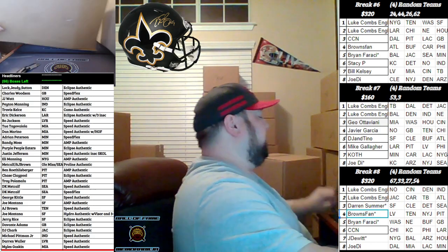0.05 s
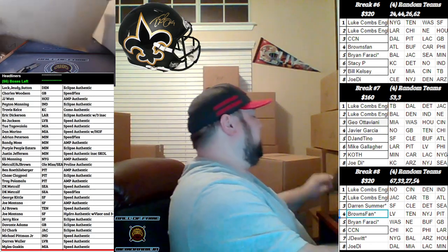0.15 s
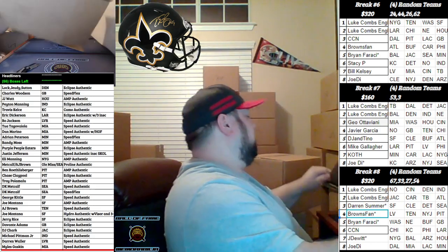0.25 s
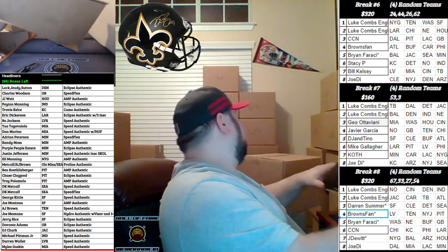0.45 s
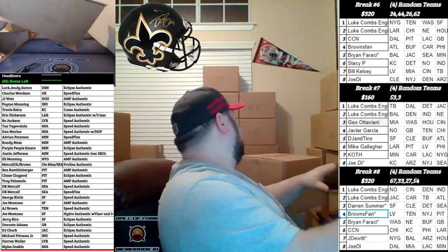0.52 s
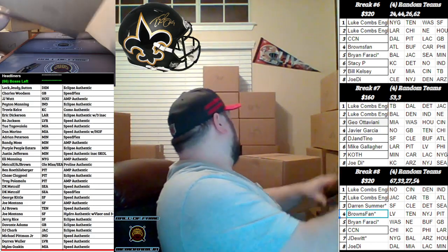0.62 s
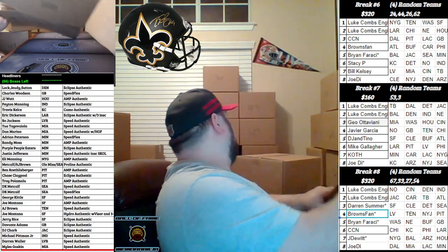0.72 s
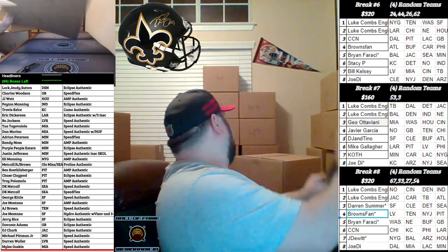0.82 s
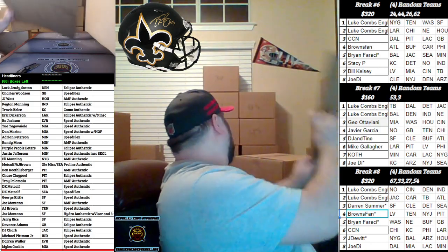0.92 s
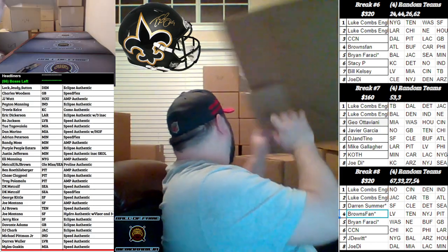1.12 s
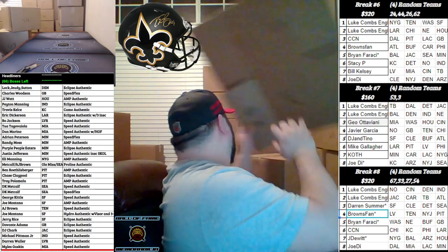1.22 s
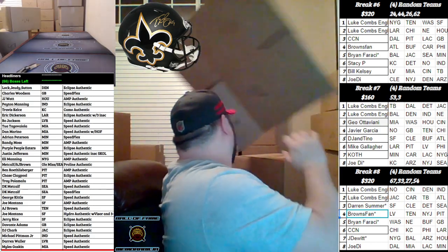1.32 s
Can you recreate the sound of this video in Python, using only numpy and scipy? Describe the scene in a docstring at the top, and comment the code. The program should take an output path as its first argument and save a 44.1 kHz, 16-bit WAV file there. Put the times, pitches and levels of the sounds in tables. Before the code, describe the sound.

A cardboard box handled close to the microphone: a soft low bump, a short squawking scrape, then a loud hollow double knock with papery sliding, fading into light ticks and rustles in a lively small room.

```python
"""In a small live room, a cardboard box is worked out of a stack and lifted.
It bumps hollowly (decaying box modes, slap, thud) and judders in two short squawks (slips ring a panel).
It slides with a papery hiss (coloured clicks); edges tick (noise bursts) and flaps knock (roughened notes).
One microphone takes the box direct, with no distance loss, then the room's reverberation and its quiet air."""
import sys
import numpy as np
from scipy import signal
from scipy.fft import rfft, irfft
from scipy.io import wavfile
from scipy.ndimage import uniform_filter1d

SR = 44100
rng = np.random.default_rng(int(sys.argv[2]) if len(sys.argv) > 2 else 0)


def to_wav(s):
    """Save 16-bit WAV."""
    ch = np.atleast_2d(s).T  # columns
    pcm = np.round(np.clip(ch, -1, 1) * 32767)  # PCM
    wavfile.write(sys.argv[1], SR, pcm.astype(np.int16))


N = 59535  # samples, 1.35 s


def undb(db):
    """Decibels to gain."""
    return 10 ** (np.asarray(db) / 20)


def unit(x):
    """Scale to rms 1."""
    return x / np.sqrt(np.mean(x ** 2) + 1e-20)


def since(start):
    """Seconds since a start time, zero before it."""
    return np.maximum(np.arange(N) / SR - start, 0)


def fade(t, t60):
    """Exponential decay, 60 dB down at t60."""
    return np.exp(-np.log(1000) * t / max(t60, 1e-3))


def swell(start, attack, hold, release):
    """Linear attack, hold and exponential release (a t60) of one stroke."""
    rise = np.minimum(since(start) / max(attack, 1e-4), 1)
    return rise * fade(since(start + attack + hold), release)


def spectrum_gain(points, tilt_db):
    """Gain per FFT bin through (f/Hz, level/dB) points, straight in octaves, plus a tilt per octave."""
    octave = np.log2(np.maximum(np.fft.rfftfreq(N, 1 / SR), 10))
    hz, db = np.array(points).T
    return undb(np.interp(octave, np.log2(hz), db) + tilt_db * octave)


def colour(x, points, tilt_db=0):
    """Give a steady signal a spectrum; rms 1."""
    return unit(irfft(rfft(x) * spectrum_gain(points, tilt_db), N))


def convolve(x, response):
    """Pass a sound through a response."""
    return signal.fftconvolve(x, response)[:N]


def strike(points, start, t60, tilt_db=0):
    """A dying burst of noise through a causal filter with the given spectrum; starts at rms 1."""
    # folding the cepstrum onto positive times makes the filter minimum phase
    cepstrum = irfft(np.log(spectrum_gain(points, tilt_db)), N)
    response = irfft(np.exp(rfft(2 * cepstrum[:N // 2], N)), N)[:N // 10]
    t = since(start)
    burst = rng.choice([-1, 1], N) * (t > 0) * fade(t, t60)
    return convolve(burst, response / np.linalg.norm(response))


# bumps of the box: t/s, level/dB, contact/ms, pitch factor of the spot that is hit,
# slap of the face level/dB, deep thud level/dB
BUMP_BLOWS = [(.002, -28.5, 3, 0.88, -50, -55), (0.049, -18.5, 6.9, 0.95, -63, -41),
              (.303, -28, 0.52, 1.02, -31.5, -50), (.320, -27, 2.2, 1.02, -31, -45),
              (.4585, -9.5, 0.45, 1, -22, -44), (0.475, -13, 1.3, 1, -27, -45.5),
              (0.5278, -22, 1.0, 1, -31, -41.5), (0.584, -53, 3.8, 1, -48, -44.5),
              (0.677, -43, 1.1, 1, -45, -44), (.694, -49, 1.5, 0.78, -43, -44),
              (.777, -40, 1.2, 1.02, -48, -74), (.924, -37.5, 2.3, 1.02, -41.5, -53),
              (0.94, -43, 2.4, 1.06, -49, -54.5)]
# hollow ring of the box: f/Hz, level/dB, t60/s
BOX_MODES = [(181, -28.5, 0.43), (234.3, -1, 0.16), (298.3, -1.5, 0.21), (380.3, -15, 0.41),
             (412.6, -8, 0.18), (482, -10.5, 0.23), (642, -19.5, 0.35), (942, -11, 0.11), (1033, -13, 0.16),
             (1083, -19, 0.19), (1150, -22.5, 0.38), (1297, -23, .2)]
# spectrum of the slap: f/Hz, level/dB
SLAP_SPECTRUM = [(40, -37), (140, -27), (240, -1.5), (420, 0.5), (700, -6), (1050, -1.5), (1600, -3),
                 (2100, -20.5), (6000, -24.5), (16000, -40)]
# spectrum of the thud: f/Hz, level/dB
THUD_SPECTRUM = [(20, -23), (65, -6), (130, -0.5), (200, -6), (400, -3.5), (2000, -57)]
SLAP_T60_S, THUD_T60_S = 0.11, 0.17
BOX_BUILD_S = 0.0048  # the ring spreads over the walls


def bumps():
    """Each blow rings the box, duller when the contact is soft, with a slap and a thud."""
    out = np.zeros(N)
    for start, db, contact_ms, pitch, slap_db, thud_db in BUMP_BLOWS:
        t = since(start)
        build = 1 - np.exp(-t / BOX_BUILD_S)
        for hz, mode_db, t60 in BOX_MODES:
            softness = 1 / (1 + (hz * contact_ms / 1000) ** 2)  # long contact weakens high modes
            ring = np.sin(2 * np.pi * hz * pitch * t) * fade(t, t60)
            out += undb(db + mode_db) * softness * build * ring
        out += undb(slap_db) * strike(SLAP_SPECTRUM, start, SLAP_T60_S)
        out += undb(thud_db) * strike(THUD_SPECTRUM, start, THUD_T60_S)
    return out


GRAINS_PER_S, GRAIN_SPREAD_DB = 9000, 2
CATCHES_PER_S, CATCH_DB = 160, 1.5  # rate and depth of the clumping


def grit():
    """Paper fibres catching: dense tiny clicks that come in clumps."""
    hits = (rng.random(N) < GRAINS_PER_S / SR) * rng.choice([-1, 1], N)
    clicks = hits * undb(GRAIN_SPREAD_DB * np.minimum(rng.exponential(size=N), 5))
    clumps = np.interp(since(0) * CATCHES_PER_S, np.arange(N), rng.standard_normal(N))
    return clicks * undb(CATCH_DB * clumps)


# stick-slip squawks: t/s, attack/s, hold/s, release t60/s, level/dB, slip rate f/Hz
SQUAWK_STROKES = [(0.198, 0.015, 0.017, 0.17, -21.5, 279), (0.297, .012, 0.0044, 0.13, -33.5, 270)]
# panel resonances that the slips ring: f/Hz, width/Hz, level/dB
PANEL_MODES = [(276, 20, -10), (567.3, 34, 4), (829, 36, 1.5), (1320, 49, 1), (1531, 42, 10.5),
               (1580, 41, 5), (1930, 23, -0.5), (2023, 19, 9.5), (2470, 19, -5), (2700, 26, -11),
               (2998, 33, -2.5)]
# spectrum of the rasp of fibres: f/Hz, level/dB
RASP_SPECTRUM = [(30, -45), (150, -33), (400, 0.5), (1000, 13), (1600, 4), (2400, 7.5), (3100, -2),
                 (3700, -24), (16000, -42)]
SLIP_JITTER, SLIP_SCATTER_DB = 0.016, 3.5  # jitter is a share of the slip period
SLIP_NOISE, RASP_DB = 0.055, -5  # noise amplitude beside slips near 1; rasp beside the squawk
PANEL_LOW_HZ = 130  # the panel radiates little below this


def panel_response():
    """Impulse response of the panel: damped resonances, high-passed."""
    t = since(0)
    ring = sum(undb(db) * width * np.exp(-np.pi * width * t) * np.cos(2 * np.pi * hz * t)
               for hz, width, db in PANEL_MODES)
    return signal.sosfilt(signal.butter(2, PANEL_LOW_HZ, "high", fs=SR, output="sos"), ring)


def squawks():
    """Card sticks and slips in an uneven pulse train that rings the panel, over a rasp of fibres."""
    out = np.zeros(N)
    panel = panel_response()
    for start, attack, hold, release, db, slip_hz in SQUAWK_STROKES:
        timing, strength = rng.standard_normal((N // 100, 2)).T
        slip_s = start + np.cumsum(1 + SLIP_JITTER * timing) / slip_hz - 1 / slip_hz
        at = np.maximum((slip_s * SR).astype(int), 0)
        slips = np.bincount(at, undb(SLIP_SCATTER_DB * strength), N)[:N]
        slips = slips + SLIP_NOISE * rng.standard_normal(N)
        push = undb(db) * swell(start, attack, hold, release)
        # the unpushed train sets the reference level
        out += convolve(slips * push, panel) / np.std(convolve(slips, panel))
        out += undb(RASP_DB) * push * colour(grit(), RASP_SPECTRUM)
    return out


# slides of card on card: t/s, attack/s, hold/s, release t60/s, hiss level/dB,
# rub of the panel level/dB, hiss tilt/dB per octave
SLIDE_STROKES = [(0, 0.001, 0.017, 0.46, -44, -39, 5.5), (0.156, 0.013, 0.02, 0.23, -52, -48.5, 6),
                 (0.198, 0.0091, 0.034, 0.41, -33.5, -30, 6),
                 (0.374, 0.015, 0.0095, 0.41, -48.5, -41.5, -3), (0.47, 0.017, 0.037, .3, -26.5, -27, -2),
                 (0.552, 0.013, 0.014, 0.19, -36, -47, 1.5), (0.633, 0.017, 0.16, 0.4, -56, -46.5, 8.5),
                 (0.772, 0.016, 0.0044, 0.29, -41, -43, 3), (0.832, .015, 0.067, 0.18, -53.5, -52.5, 1),
                 (0.914, 0.0042, 0.024, 0.12, -45.5, -41.5, -1.5),
                 (1.09, 0.0078, 0.019, .2, -51.5, -64, -3)]
# spectrum of the hiss: f/Hz, level/dB
HISS_SPECTRUM = [(200, -25), (1000, -14), (2300, 1.5), (3300, -1.5), (5200, 1.5), (7500, 1), (10000, -5),
                 (13000, -9.5), (16000, -23)]
# spectrum of the rub: f/Hz, level/dB
RUB_SPECTRUM = [(50, -22), (150, -4.5), (390, 7), (700, -1.5), (1280, 2), (1800, -2), (2800, -8.5),
                (6000, -29), (16000, -50)]


def slides():
    """Sliding faces hiss, and the panel under them gives a lower rub."""
    out = np.zeros(N)
    for start, attack, hold, release, hiss_db, rub_db, tilt_db in SLIDE_STROKES:
        hiss = undb(hiss_db) * colour(grit(), HISS_SPECTRUM, tilt_db)
        rub = undb(rub_db) * colour(grit(), RUB_SPECTRUM)
        out += swell(start, attack, hold, release) * (hiss + rub)
    return out


# ticks of edges and flaps: t/s, level/dB, tilt/dB per octave
TICK_EVENTS = [(.0095, -30.5, 5.5), (.036, -46, 12), (0.05, -45, 1), (.196, -31, -2.5), (0.214, -23, -6.5),
               (.308, -23, -4), (0.313, -25.5, -1.5), (0.3142, -33, -4.5), (.386, -39, 6),
               (0.394, -35.5, 6.5), (.402, -48, 2), (0.4586, -27.5, -2), (.4747, -22.5, -0.5),
               (0.515, -46, 0), (0.677, -59, 15.5), (.7745, -34.5, 12), (.784, -28, -1.5),
               (.789, -29, -1.5), (0.862, -32, 2), (0.867, -39, 2), (0.94, -39.5, 5), (1.070, -53, 4),
               (1.087, -37, -1), (1.0931, -36, 0)]
# spectrum of a tick: f/Hz, level/dB
TICK_SPECTRUM = [(100, -24.5), (400, -24.5), (620, 0.5), (770, 2), (1000, -17.5), (1250, 2.5), (1430, 9.5),
                 (1800, 3), (2400, -5), (2950, 3.5), (3500, 1), (4300, 1), (6000, 2), (8000, -3.5),
                 (11000, -9), (16000, -25.5)]
TICK_T60_S = 0.028


def ticks():
    """Edges snap past each other with short dry cracks."""
    return sum(undb(db) * strike(TICK_SPECTRUM, start, TICK_T60_S, tilt_db)
               for start, db, tilt_db in TICK_EVENTS)


# loose flaps and panels knocking, each with its own short note: t/s, f/Hz, level/dB, t60/s
FLAP_KNOCKS = [(.200, 258, -21.5, 0.16), (.314, 806, -28, .12), (0.395, 401, -36.5, 0.26),
               (.785, 1736, -31.5, 0.074), (0.787, 385, -37, .18), (0.912, 1203, -37, 0.12),
               (1.090, 1410, -45, 0.1), (1.088, 2896, -44.5, .06), (1.091, 763, -56, 0.13)]
FLAP_DRIFT = 0.0254  # rms share of the pitch


def flaps():
    """A knock rings briefly as a short note, roughened by random pitch drift."""
    out = np.zeros(N)
    for start, hz, db, t60 in FLAP_KNOCKS:
        drift = unit(uniform_filter1d(rng.standard_normal(N), size=130))  # smoothed over 3 ms
        cycles = np.cumsum(hz * (1 + FLAP_DRIFT * drift)) / SR
        out += undb(db) * swell(start, 0.0038, 0, t60) * np.sin(2 * np.pi * cycles)
    return out


# reverberation of the room by band: f/Hz, t60/s, level/dB
ROOM_BANDS = [(100, 0.3, -17), (310, 0.57, -23), (680, 0.69, -9), (1430, 0.48, -9.5), (3700, 0.43, -5.5),
              (8000, .52, -8.5), (13900, 0.58, -19)]
ROOM_GAP_S, ROOM_BUILD_S = 0.0024, 0.0082  # wait after the direct sound, then rise


def room(x):
    """Diffuse reverberation with its own length and level in each band."""
    octave = np.log2(np.fft.rfftfreq(N, 1 / SR) + 1)
    centres = np.log2([hz for hz, _, _ in ROOM_BANDS])
    chance, response = rfft(rng.standard_normal(N)), np.zeros(N)
    # each band crossfades into its neighbours
    for share, (_, t60, db) in zip(np.eye(len(ROOM_BANDS)), ROOM_BANDS):
        band = irfft(chance * np.interp(octave, centres, share), N)
        tail = swell(ROOM_GAP_S, ROOM_BUILD_S, 0, t60)
        response += undb(db) * band * tail / np.linalg.norm(tail)
    return convolve(x, response)


# spectrum of the steady room noise: f/Hz, level/dB
AIR_SPECTRUM = [(15, -88), (25, -62.5), (107, -16), (148, -29.5), (189, -2), (222, -17.5), (268, -7.5),
                (485, -12.5), (525, -16), (1090, -15), (2130, -20), (6270, -28.5), (15700, -47)]
AIR_DB = -59


def air():
    """The quiet room itself: steady coloured noise."""
    return undb(AIR_DB) * colour(rng.standard_normal(N), AIR_SPECTRUM)


def scene():
    """The handled box, its room and the quiet air, on one channel."""
    box = bumps() + squawks() + slides() + ticks() + flaps()
    return (box + room(box) + air())[None]


TOP_HZ = 15800


def record(dry):
    """The recorder cuts the top with a steep low-pass."""
    return signal.sosfilt(signal.ellip(10, .2, 80, TOP_HZ, fs=SR, output="sos"), dry)


dry = scene()
out = record(dry)
to_wav(out)
```